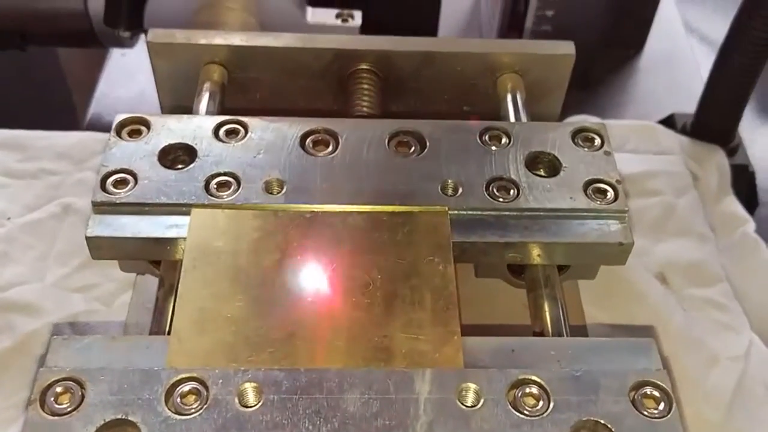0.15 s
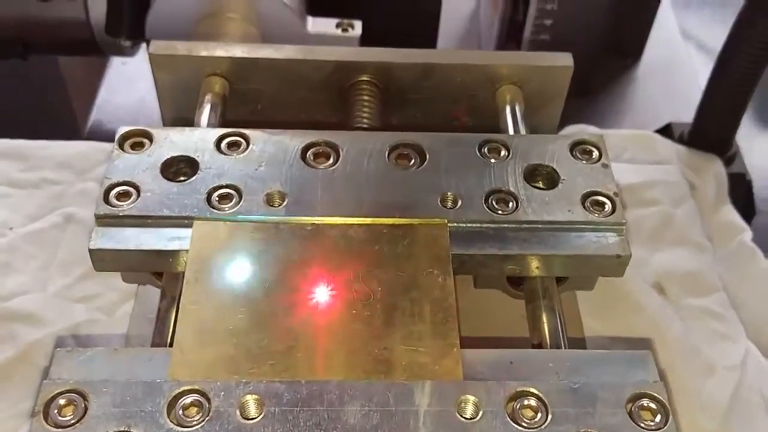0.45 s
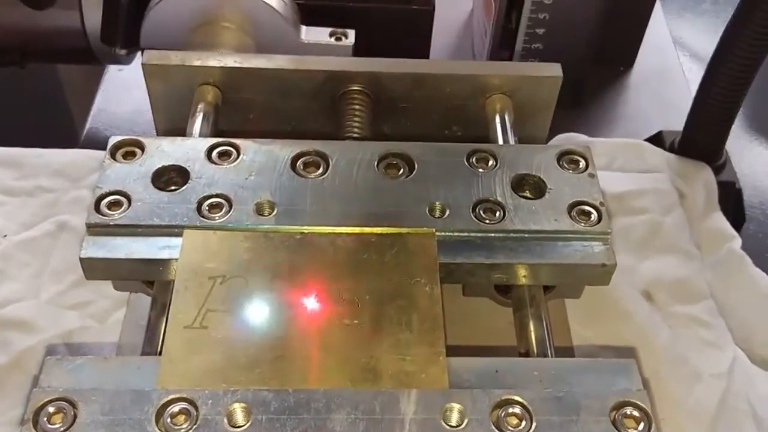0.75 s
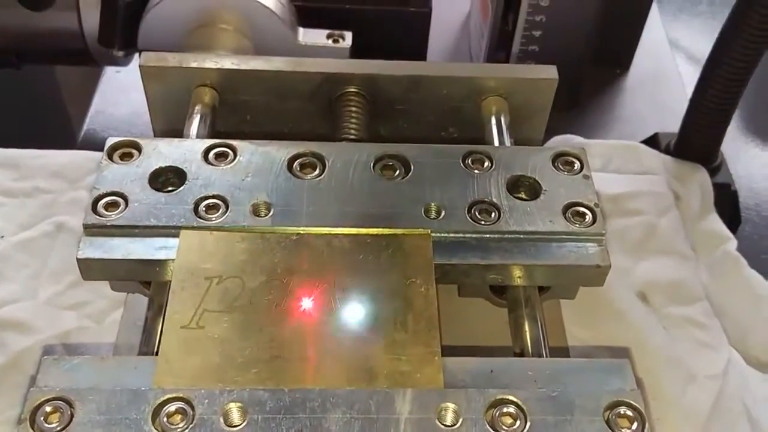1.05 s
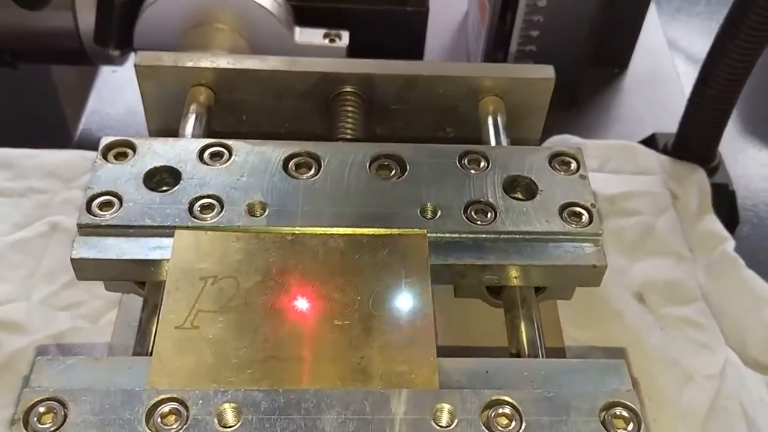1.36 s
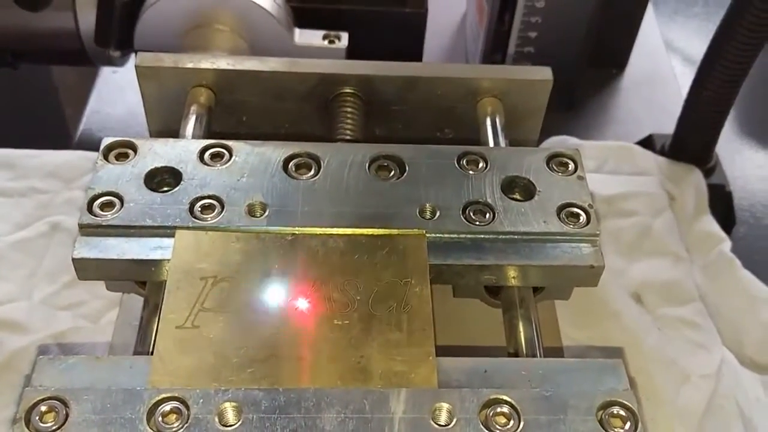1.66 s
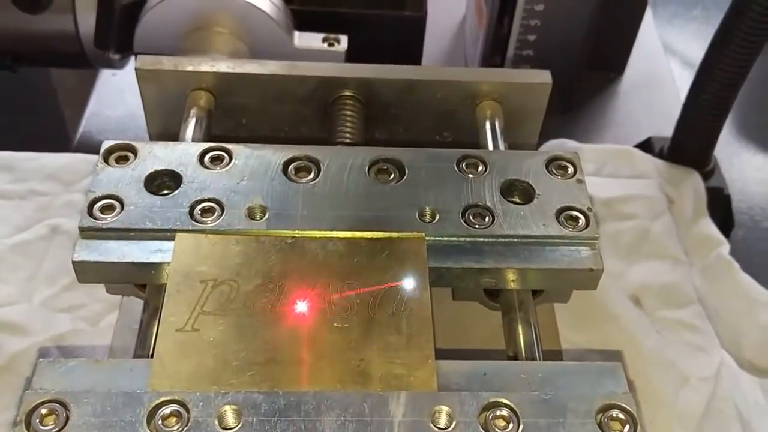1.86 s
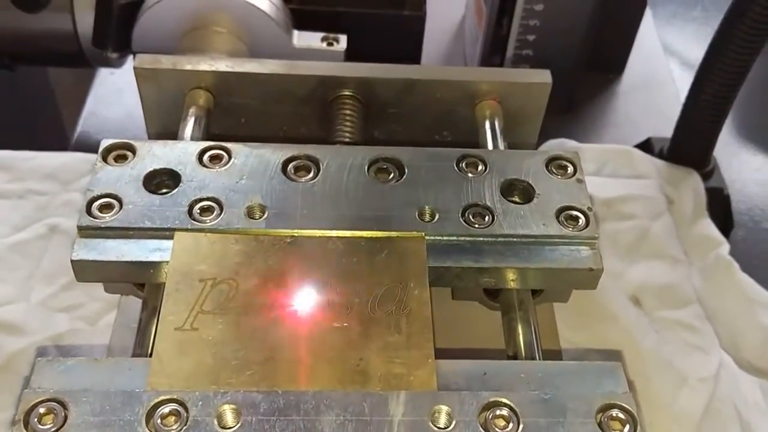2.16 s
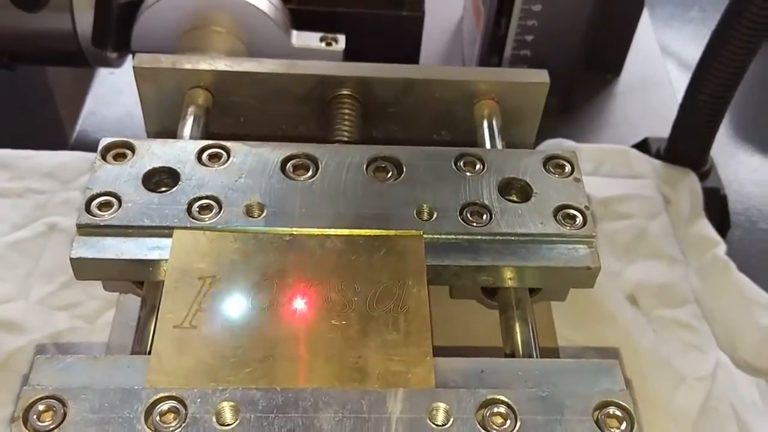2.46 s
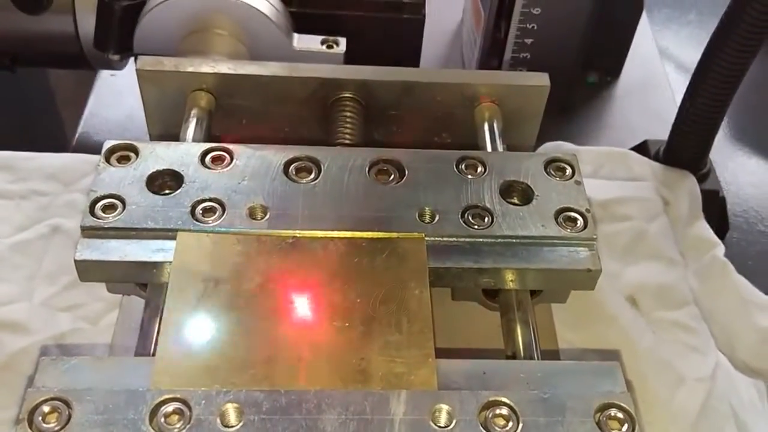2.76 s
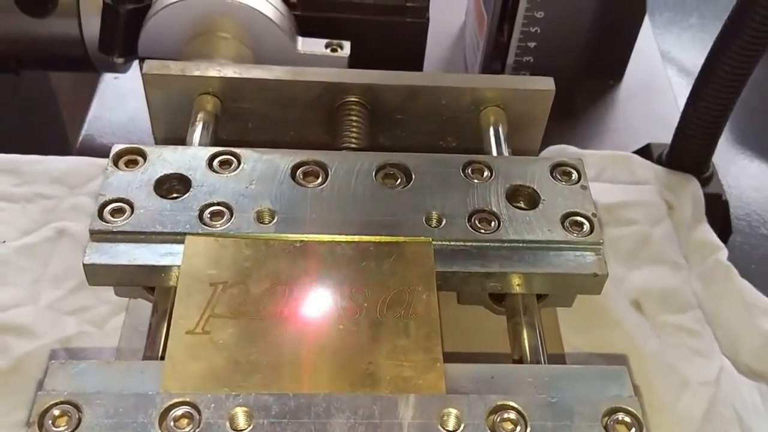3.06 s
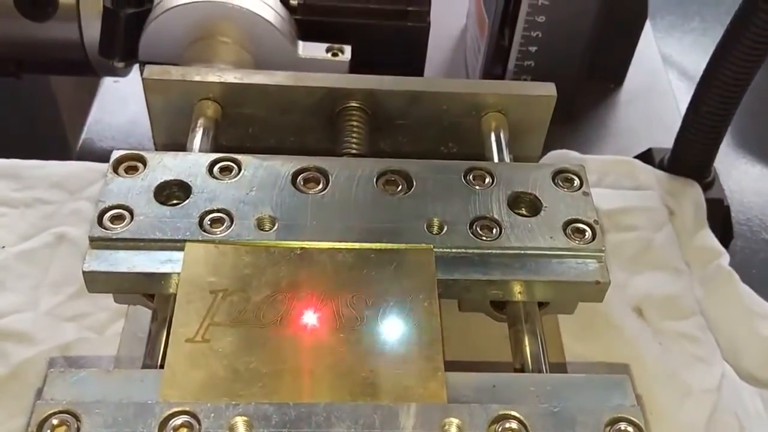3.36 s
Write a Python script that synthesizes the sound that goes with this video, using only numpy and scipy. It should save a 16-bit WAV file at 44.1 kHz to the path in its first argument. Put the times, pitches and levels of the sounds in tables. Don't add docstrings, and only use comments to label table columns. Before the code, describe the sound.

A laser engraves brass with a thin high whine in hiss and bursts of rough buzzing crackle.

```python
import sys
import numpy as np
from scipy import signal
from scipy.fft import rfft, irfft, next_fast_len
from scipy.io import wavfile
from scipy.ndimage import uniform_filter1d, map_coordinates

SR = 44100
rng = np.random.default_rng(int(sys.argv[2]) if len(sys.argv) > 2 else 0)


def log_audio(samples):
    frames = np.atleast_2d(samples).T
    limited = np.clip(frames, -1, 1)
    pcm = np.round(limited * 32767).astype(np.int16)
    wavfile.write(sys.argv[1], SR, pcm)


def invert_db(x):
    u = np.asarray(x, float) / 20
    return 10 ** u


N = 154350

STROKE_HZ = 926.3


def unit(x):
    return x / np.sqrt(np.mean(x ** 2) + 1e-20)


def curves(rows):
    s, *columns = np.transpose(rows)
    return [np.interp(np.arange(N) / SR, s, column) for column in columns]


def wobble(rate_hz):
    knots = rng.standard_normal(int(N * rate_hz / SR) + 4)
    return map_coordinates(knots, [np.arange(N) * rate_hz / SR])


def coloured(x, points):
    size = next_fast_len(N + 8192)
    hz, db = np.transpose(points)
    log_hz = np.log(np.fft.rfftfreq(size, 1 / SR) + 1)
    gain = invert_db(np.interp(log_hz, np.log(hz), db))
    return unit(irfft(rfft(x, size) * gain, size)[..., :N])


def hiss(points, patchy_db):
    z = signal.stft(rng.standard_normal(N), nperseg=256)[2]
    patches = uniform_filter1d(rng.standard_normal(z.shape), size=2, axis=0)
    patches = uniform_filter1d(patches, size=30, axis=1)
    noise = signal.istft(z * invert_db(patchy_db * unit(patches)), nperseg=256)[1][:N]
    return coloured(noise, points)


def pair(make):
    alike = .33
    return np.sqrt(alike) * make() + np.sqrt(1 - alike) * np.array([make(), make()])


def repeating(x):
    echo = .27
    once = map_coordinates(x, [np.arange(N) - SR / STROKE_HZ], mode="nearest")
    twice = np.roll(x, round(SR / STROKE_HZ * 2))
    return unit(x + echo * once + echo ** 2 * twice)


def overtone(turns, multiple, db):
    flutter_db = 3.4 * (wobble(9) + .8 * wobble(45))
    slip = .45 * (wobble(40) + wobble(250))
    return invert_db(db + flutter_db) * np.sin(2 * np.pi * round(multiple) * turns + slip)


def overtones(turns, orders):
    return sum(overtone(turns, multiple, db) for multiple, db in orders)


def plasma(turns, whine_db):
    # multiple, level_db
    air_orders = [(1, -27), (2, -8), (3, -69), (4, -8.5), (5, 2), (6, 3), (7, 3), (8, -10.5), (9, -3.5),
                  (10, -10), (11, -6.5), (12, -13)]
    # pitch_hz, level_db (per Hz)
    plume_colour = [(1000, -12.5), (2200, 1.5), (3300, 0.5), (6500, 8), (8200, 1.1), (10500, -1.5),
                    (12500, -4.5), (15500, -11)]
    whine = pair(lambda: unit(overtones(turns, air_orders)))
    plume = pair(lambda: repeating(hiss(plume_colour, patchy_db=4)))
    return invert_db(whine_db + wobble(24.8)) * (invert_db(-5) * whine + invert_db(1) * plume)


def fizz():
    # time_s, left_db, right_db
    sizzle = [(0, -26, -40), (.2, -39, -39), (.6, -38, -36), (.9, -43, -40.5), (1.4, -30.5, -48.5),
              (1.65, -32, -43.5), (1.95, -35.5, -42), (2.3, -44.5, -50), (2.9, -40, -36), (3.1, -55, -51),
              (3.5, -48, -48)]
    # pitch_hz, level_db (per Hz)
    fizz_colour = [(11000, -50), (12800, -7.5), (14500, 3.5), (15800, -2)]
    patches = np.array([hiss(fizz_colour, patchy_db=3.5), hiss(fizz_colour, patchy_db=3.5)])
    return invert_db(np.array(curves(sizzle))) * patches


def burn_power():
    # time_s, level_db
    floor = [(0.0, -62.5), (0.62, -52), (0.8, -37), (0.89, -38), (1.09, -52.5), (1.36, -55), (1.57, -44.5),
             (1.88, -59.5), (2.26, -57), (2.82, -51), (3.09, -72), (3.5, -57)]
    # centre_s, length_s, level_db
    bursts = [(0.34, 0.019, -28.5), (0.407, 0.015, -28.5), (0.642, 0.023, -27.5), (0.682, 0.018, -23),
              (0.74, 0.077, -24), (0.827, 0.033, -19.5), (0.949, 0.041, -22), (1.012, 0.014, -22.5),
              (1.075, 0.031, -27.5), (1.257, 0.019, -29), (1.41, 0.03, -26), (1.467, 0.036, -25),
              (1.504, 0.012, -18.5), (1.56, 0.011, -24.5), (1.61, 0.056, -23), (1.652, 0.022, -24),
              (1.692, 0.017, -22.5), (2.395, 0.043, -20.5), (2.528, 0.014, -25.5), (2.562, 0.012, -20),
              (2.598, 0.038, -17.5), (2.648, 0.053, -23.5), (2.749, 0.019, -13), (2.822, 0.042, -46),
              (2.817, 0.13, -19.5), (2.904, 0.038, -19), (2.965, 0.081, -19.5), (2.965, 0.025, -21.5),
              (3.143, 0.023, -25.5), (3.184, 0.014, -23)]
    # centre_s, length_s, level_db
    spits = [(0.085, 0.0078, -33), (0.105, 0.076, -44.5), (0.205, 0.072, -39), (0.223, 0.015, -30.5),
             (0.26, 0.029, -39), (0.541, 0.011, -34.5), (0.571, 0.0098, -30.5), (0.607, 0.013, -28.5),
             (0.9, 0.027, -30), (1.135, 0.042, -36.5), (1.281, 0.012, -28.5), (1.304, 0.0045, -30.5),
             (1.33, 0.0067, -33.5), (1.53, 0.012, -30), (1.713, 0.011, -24.5), (1.765, 0.028, -34),
             (1.802, 0.058, -38.5), (1.951, 0.016, -32), (1.99, 0.019, -35.5), (2.038, 0.025, -29.5),
             (2.152, 0.038, -33), (2.188, 0.011, -34.5), (2.311, 0.031, -30), (2.451, 0.024, -25.5),
             (2.502, 0.038, -33.5), (3.022, 0.023, -34), (3.247, 0.0068, -31.5), (3.312, 0.037, -33.5),
             (3.418, 0.0093, -35), (3.454, 0.02, -38)]
    t = np.arange(N) / SR
    crackle_db = 2 * wobble(60)
    power = invert_db(1.984 * (curves(floor)[0] + 8.5 + crackle_db))
    for centre, length, db in [*bursts, *spits]:
        power = power + invert_db(2 * db - 44.0 * ((t - centre) / length) ** 2)
    return power


def rough_buzz(turns):
    # multiple, level_db
    buzz_orders = [(1, 4), (2, -7), (3, -12.5), (4, -15), (5, -11), (6, -11.5), (7, -73)]
    # pitch_hz, level_db
    rasp_colour = [(60, -84), (130, -8.5), (220, 5), (450, 0.5), (800, 2.5), (1150, -2), (2500, -3.5),
                   (6000, -8.5), (12000, -18.5)]
    stroke_size = 1 + .22 * rng.standard_normal(int(turns[-1]) + 1)[turns.astype(int)]
    saw = unit(invert_db(1.2 * wobble(35)) * overtones(turns, buzz_orders))
    pulse = 1 + 0.69 * np.cos(2 * np.pi * turns)
    rasp = hiss([(100, 0), (16000, 0)], patchy_db=1.5) * pulse
    rasp = rasp * invert_db(2.6 * wobble(400) + 1.56 * wobble(70))
    return unit(stroke_size * saw + invert_db(.5) * coloured(rasp, rasp_colour))


def overload(turns, ultrasound_db):
    # multiple, level_db
    port_orders = [(10, -19), (11, -17), (12, -12), (14, -19)]
    # pitch_hz, level_db (per Hz)
    port_colour = [(5000, -34.5), (7000, -17.5), (8500, -7), (10500, -5), (12500, -8), (15800, -13.5)]
    buzz = np.sqrt(burn_power()) * rough_buzz(turns)
    bright = hiss(port_colour, patchy_db=2.6) * (1 + .2 * np.cos(2 * np.pi * turns))
    bright = bright + overtones(turns, port_orders)
    return buzz + invert_db(ultrasound_db + 6 + 1.12 * wobble(8.1)) * bright


def fan():
    # pitch_hz, level_db
    fan_colour = [(60, -58), (130, -24), (220, 0), (700, -1), (1100, -5), (3000, -9), (8000, -12),
                  (16000, -14)]
    return invert_db(-49) * pair(lambda: hiss(fan_colour, patchy_db=4.0))


def beam():
    # start_s, length_s, depth_db
    pauses = [
        (1.558, 0.02, -10.5),
        (1.856, 0.01, -8),
        (1.995, 0.025, -26),
        (2.277, 0.0069, -5),
    ]
    t = np.arange(N) / SR
    edge_s = .002
    gain_db = 0
    for start, length, depth_db in pauses:
        inside_s = np.minimum(t - start, start + length - t)
        gain_db = gain_db + depth_db * np.clip(inside_s / edge_s + .5, 0, 1)
    return invert_db(gain_db)


def scene():
    # time_s, whine_db, ultrasound_db
    scan_levels = [(0, -39, -44.5), (.25, -35.5, -38), (.5, -37, -42), (.7, -38.5, -36), (.95, -38, -33),
                   (1.4, -37.5, -34.5), (1.6, -38.5, -33.5), (2, -39, -35.5), (2.2, -34, -32.5),
                   (2.45, -32.5, -32.5), (2.65, -34, -33), (2.85, -36, -31.5), (3.1, -33.5, -36.5),
                   (3.5, -35.5, -38.5)]
    whine_db, ultrasound_db = curves(scan_levels)
    drift_hz = 1.5 * (2 * wobble(7) + wobble(80))
    turns = np.cumsum(STROKE_HZ + drift_hz) / SR
    left_only = np.array([[1], [0]])
    marking = plasma(turns, whine_db) + fizz() + overload(turns, ultrasound_db) * left_only
    return marking * beam() + fan()


def gate(x):
    # pitch_hz, threshold_db
    thresholds = [(2300, -13), (3300, -6), (4500, -5.2), (7000, -5.2), (7800, -5), (11000, -4.8),
                  (13500, -3.8), (16000, -4)]
    lead = 339
    padded = np.pad(x, ((0, 0), (lead, 0)))
    hz, _, z = signal.stft(padded, SR, "cosine", nperseg=2048)
    power = abs(z) ** 2
    wide = uniform_filter1d(uniform_filter1d(power, size=90, axis=1), size=3, axis=2)
    band = power[:, :1020].reshape(2, 85, 12, -1).mean(axis=2)
    band = uniform_filter1d(band, size=2, axis=2)
    band = np.repeat(band, 12, axis=1)[:, np.minimum(np.arange(1025), 1019)]
    threshold = invert_db(2 * np.interp(hz, *np.transpose(thresholds)))[:, None]
    need = threshold * (wide + .11 * wide[::-1])
    return signal.istft(z * (band > need), SR, "cosine", nperseg=2048)[1][:, lead:lead + N]


def top_cut(x):
    return signal.sosfilt(signal.butter(12, 17090, fs=SR, output="sos"), x)


def record(dry):
    size = next_fast_len(N + 8192)
    hz = np.fft.rfftfreq(size, 1 / SR)
    bass_cut = hz ** 4 / (hz ** 4 + 100 ** 4)
    mix = irfft(rfft(gate(dry), size) * (hz < 15740) * bass_cut, size)[:, :N]
    return top_cut(mix)


dry = scene()
out = record(dry)
log_audio(out)
```